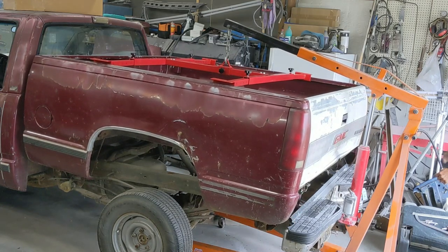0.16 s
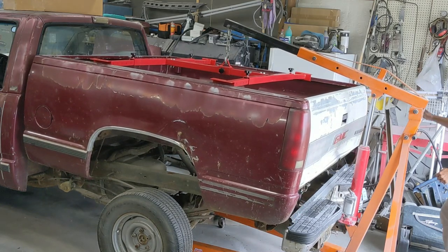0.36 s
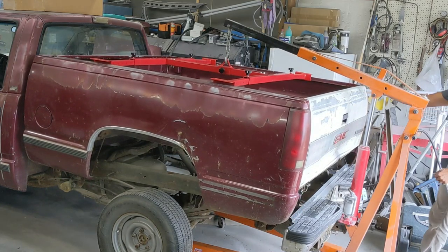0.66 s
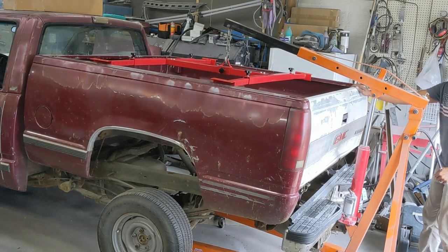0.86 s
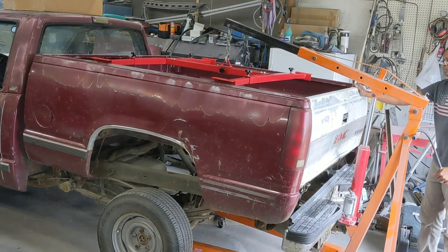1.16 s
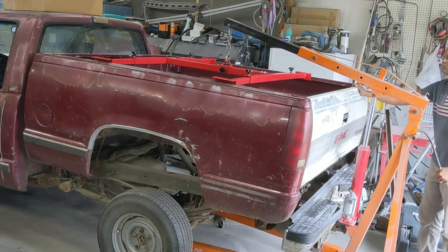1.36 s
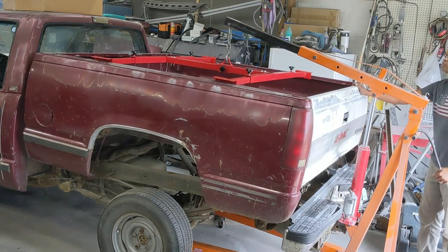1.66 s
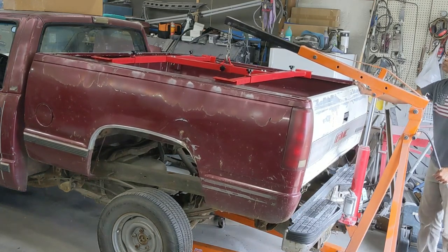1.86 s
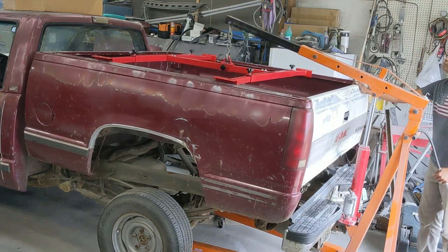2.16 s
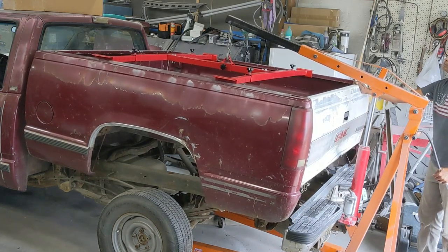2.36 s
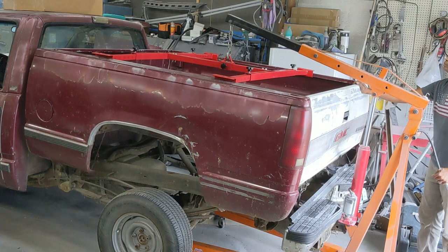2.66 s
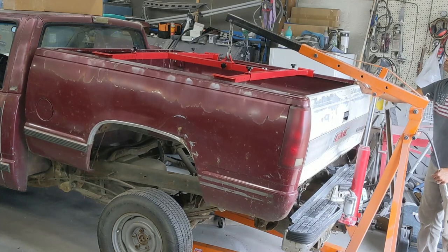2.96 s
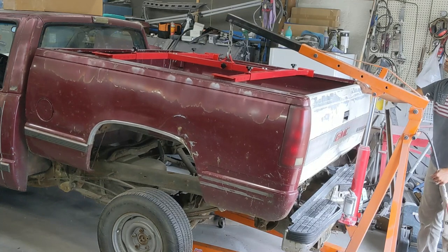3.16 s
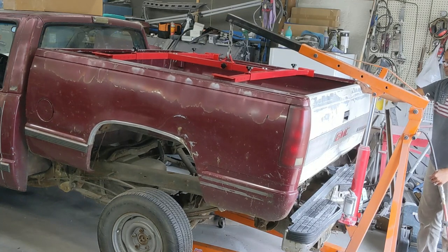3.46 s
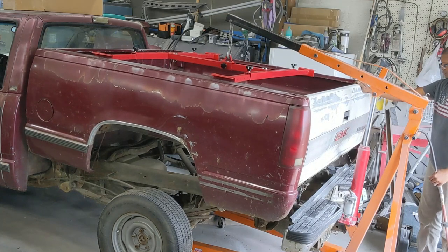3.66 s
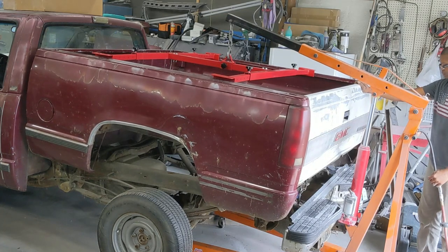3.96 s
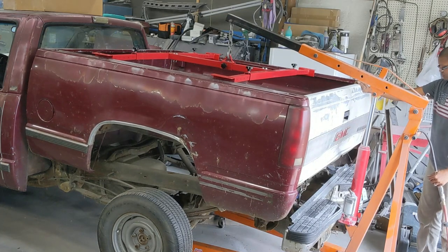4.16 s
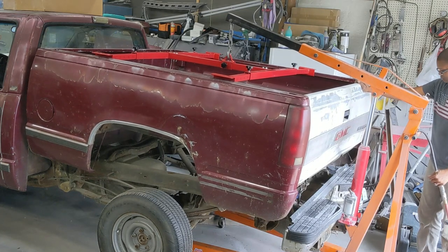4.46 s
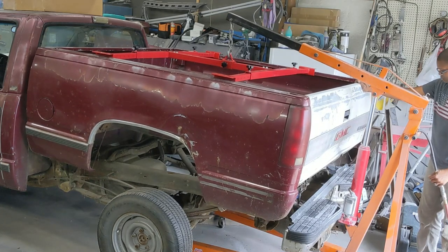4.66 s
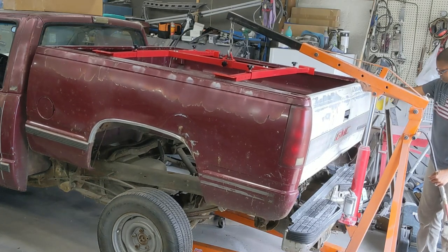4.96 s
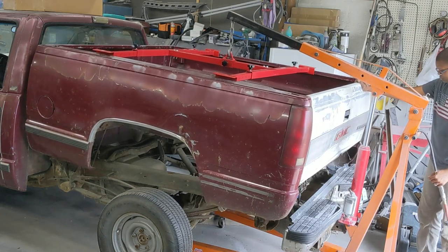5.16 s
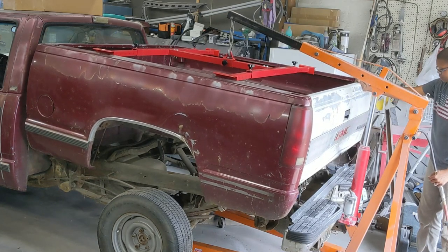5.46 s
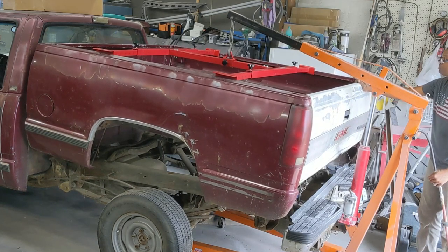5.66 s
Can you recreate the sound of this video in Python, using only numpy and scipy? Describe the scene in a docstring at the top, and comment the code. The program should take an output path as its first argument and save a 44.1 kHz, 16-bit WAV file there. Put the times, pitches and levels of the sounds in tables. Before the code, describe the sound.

Close stereo pickup of a pneumatic pump lifting a truck bed: isolated chuffs with clanking knocks, then a machine-like burst of about a dozen strokes. A pause of around a second and a half holds only low hum, rumble, a faint tick and a dull clunk. Pumping then resumes briefly and slows to single strokes, with feed air hissing underneath and short garage reverberation.

```python
"""An air-driven hydraulic ram on an engine hoist lifts a pickup bed in a garage: single strokes and two quick runs.
Each stroke vents a puff of jet noise with a low thump from the shoved hoist.
Some 30 ms later the pump piston lands: a dull knock, with near echoes, and ringing modes of the steel frame.
Feed air hisses as filtered noise while the trigger is held; hoist, trigger and load give a few small noise bursts.
A wavering hum of four tones and a low noise rumble fill the room."""
import sys
import numpy as np
from scipy import signal
from scipy.fft import rfft, irfft
from scipy.io import wavfile

SR = 44100
rng = np.random.default_rng(int(sys.argv[2]) if len(sys.argv) > 2 else 0)


def file_out(sig):
    """Save sig as 16-bit WAV at sys.argv[1]."""
    # one column per channel
    cols = np.atleast_2d(sig).T
    # limit, then scale
    lim = np.clip(cols, -1, 1)
    pcm = np.round(lim * 32767).astype(np.int16)
    wavfile.write(sys.argv[1], SR, pcm)


N = 255780  # length in samples


def amp(db):
    """Turn dB into a plain factor."""
    return 10 ** (np.asarray(db) / 20)


def unit(x):
    """Scale a sound to an rms of 1."""
    return x / np.sqrt(np.mean(x ** 2) + 1e-20)


def read(points, hz):
    """Read a curve between its points, along a logarithmic pitch scale."""
    point_hz, value = np.transpose(points)
    return np.interp(np.log(hz + 1), np.log(point_hz + 1), value)


def add(mix, s, sound):
    """Mix a sound in at a time in seconds."""
    part = mix[max(round(s * SR), 0):][:len(sound)]
    part += sound[:len(part)]


def late(x, s):
    """Delay a sound by some seconds."""
    return np.interp(np.arange(N) - s * SR, np.arange(N), x, left=0)


def convolve(x, response):
    """Start a copy of the response at every sample of x."""
    return signal.fftconvolve(np.atleast_2d(x), np.atleast_2d(response), axes=1)[:, :N]


def click(points, size=4096):
    """Causal impulse of energy 1 with the given spectrum."""
    hz = abs(np.fft.fftfreq(size, 1 / SR))
    log_gain = np.log(amp(read(points, hz)))
    # this choice of phase puts the energy as early as possible
    spectrum = np.exp(np.conj(signal.hilbert(log_gain)))
    h = np.fft.ifft(spectrum).real
    return h / np.linalg.norm(h)


def ring(modes):
    """One second of dying modes, each a sine that falls 60 dB in its t60."""
    t = np.arange(SR) / SR
    return sum(amp(db - 60 * t / t60) * np.sin(2 * np.pi * hz * t) for hz, db, t60 in modes)


def strike(modes, times, levels_db, scatter, vary_db):
    """Blows on one set of modes; each time every mode starts a little late and rings louder or softer."""
    out = np.zeros(N)
    tones = [ring([mode]) for mode in modes]
    for s, db in zip(times, levels_db):
        for tone, (delay, vary) in zip(tones, rng.standard_normal((len(tones), 2))):
            add(out, s + scatter * abs(delay), amp(db + vary_db * vary) * tone)
    return out


def drift(rate):
    """Slow random wander of rms 1; its spectrum fades out around the rate in Hz."""
    fade = np.exp(-(np.fft.rfftfreq(N, 1 / SR) / rate) ** 2)
    return unit(irfft(rfft(rng.standard_normal(N)) * fade, N))


# How alike diffuse sound is at left and right.
# Each row: frequency in Hz, likeness from 0 (unrelated) to 1 (the same).
LIKENESS = [(100, 0.85), (400, 0.71), (900, 0.38), (1800, 0.12), (4000, 0.13), (16000, .1)]


def diffuse(size):
    """Spectra of noise at two close microphones: alike in the bass, nearly unrelated in the treble."""
    hz = np.fft.rfftfreq(size, 1 / SR)
    a, b = np.exp(2j * np.pi * rng.random((2, len(hz))))
    alike = np.clip(read(LIKENESS, hz), 0, 1)
    mid = np.sqrt((1 + alike) / 2) * a
    side = np.sqrt((1 - alike) / 2) * b
    return hz, np.array([mid + side, mid - side])


# Tones of the machine hum. Each row: frequency in Hz, level in dB before the swell.
HUM = [(53.8, -47.5), (102.3, -44), (134.6, -45.5), (204.6, -52.5)]
# Slow rise and fall of the whole hum. Each row: time in seconds, change in dB.
HUM_SWELL = [(0, -13), (.7, -3), (3.3, 0), (3.9, -4), (4.25, 1.5), (5.8, -2.5)]
# Colour of the room's rumble. Each row: frequency in Hz, relative level in dB per Hz.
RUMBLE = [(20, -29), (45, -22), (75, -0.5), (90, 6), (115, -13.5), (145, 1), (180, -12.5), (310, -26),
          (600, -34), (1500, -33.5), (4000, -43.5), (10000, -48), (14000, -44)]


def background(rumble_db=-42, waver=0.19, thin_db=-73, thin_hz=7550, thin_width_hz=200):
    """A wavering machine hum over low rumble, with a faint thin hiss high up."""
    t = np.arange(N) / SR
    hum = np.zeros(N)
    for hz, db in HUM:
        loudness = amp(db) * np.sqrt(2) * (1 + waver * drift(8.1))
        phase = 2 * np.pi * (hz * t + rng.random()) + .5 * drift(5.4)
        hum += loudness * np.cos(phase)
    swell = amp(np.interp(t, *np.transpose(HUM_SWELL)))
    hz, noise = diffuse(N)
    rumble = unit(irfft(noise * amp(read(RUMBLE, hz)), N))
    narrow = 1 / (1 + ((hz - thin_hz) / thin_width_hz) ** 2)
    thin_hiss = unit(irfft(diffuse(N)[1] * narrow, N))
    return hum * swell + amp(rumble_db) * rumble + amp(thin_db) * thin_hiss


# Resonances of the air motor housing, blown by the air and tapped by the valve.
# Each row: frequency in Hz, width in Hz, relative level in dB.
HOUSING = [(1062.6, 16, 12.5), (1145, 13, 11), (1370, 24, 2), (1502, 30, 3), (1734, 120, -5),
           (1717, 28, 16.5), (1888, 16, 9.5), (2393, 50, 6.5)]


def blow_housing(air):
    """Rushing air sounds the resonances of the motor housing."""
    return sum(amp(db) * signal.lfilter(*signal.iirpeak(hz, hz / width, SR), air)
               for hz, width, db in HOUSING)


# Colour of the feed air in the trigger valve. Each row: frequency in Hz, relative level in dB per Hz.
FEED_AIR = [(200, 14), (900, -7), (2200, -2), (3300, -1), (6500, 2.5), (8000, -3), (10500, -3),
            (12500, 5.5), (14000, 4.5), (15800, 1)]
# Squeezes of the air trigger. Each row: pressed in seconds, fully shut in seconds,
# relative hiss level in dB when fully down, time to press in seconds,
# time to ease off before it is shut in seconds.
TRIGGER = [(0, 0.056, -24.5, .004, 0.057), (.255, .42, -51.5, .02, 0.11), (0.841, 2.92, -32.5, .62, 0.13),
           (2.918, 3.32, -61, .02, .13), (4.353, 5.5, -33, .04, 0.37)]


def feed(flutter_db=1.3, flutter_hz=30, housing_db=-12):
    """Air hisses through the trigger valve and the housing, louder the further the trigger is pressed."""
    t = np.arange(N) / SR
    flow = np.zeros(N)
    for pressed, shut, db, press_s, ease_s in TRIGGER:
        squeeze = np.minimum((t - pressed) / press_s, (shut - t) / ease_s)
        flow += amp(db) * np.clip(squeeze, 0, 1)
    air = rng.standard_normal(N) * flow * amp(flutter_db * drift(flutter_hz))
    return convolve(air, click(FEED_AIR))[0] + amp(housing_db) * blow_housing(air)


# Runs of the pump; when the two times nearly agree, the run is one stroke at the first time.
# Each row: first stroke in seconds, last stroke in seconds, then three changes in dB:
# piston, exhaust air and valve rattle.
RUNS = [(0.0283, 0.033, 0, .3, 1), (.335, 0.33, .8, -.8, 5), (1.0178, 1.001, 1, .3, 4),
        (1.25, 1.26, .3, -1.5, -3), (1.4105, 1.386, -.5, .6, -3), (1.5405, 2.8408, -.6, -.3, -1),
        (4.4379, 5.0140, 0.52, .1, 1), (5.138, 5.1382, .5, 0, -1), (5.294, 5.318, .5, 0, 0),
        (5.4701, 5.487, -.3, -2.5, 1)]
PERIOD_S = .117  # about one stroke at full speed; sets how many strokes fill a run
SAG_S = 0.002096  # the pump slows as pressure builds, so the middle of a run comes this much early
TRAVEL_S, TRAVEL_SCATTER_S = .0328, .0009  # from the exhaust opening to the piston landing


def strokes():
    """Fill each run with strokes at the pump's pace: exhaust and landing times, and three levels."""
    rows = []
    for first, last, *levels_db in RUNS:
        along = np.linspace(0, 1, round(abs(last - first) / PERIOD_S) + 1)
        times = first + (last - first) * along - SAG_S * np.sin(np.pi * along)
        rows += [(s, *levels_db) for s in times]
    opens, piston_db, air_db, rattle_db = np.transpose(rows)
    lands = opens + TRAVEL_S + TRAVEL_SCATTER_S * rng.standard_normal(len(opens))
    return opens, lands, piston_db, air_db, rattle_db


def uneven(levels_db, spread_db):
    """No two strokes are quite equally strong."""
    return levels_db + spread_db * rng.standard_normal(len(levels_db))


def blows(times, levels_db):
    """One impulse a stroke."""
    out = np.zeros(N)
    for s, db in zip(times, levels_db):
        add(out, s, amp([db]))
    return out


# Colour of the exhaust jet. Each row: frequency in Hz, relative level in dB per Hz.
JET = [(100, -2), (300, -8.5), (600, 0.5), (870, -17), (1100, 1.5), (2000, -0.5), (3300, -1), (5600, 1.5),
       (7600, -1.5), (9500, -1), (12000, 3), (15800, 0.5)]


def exhaust(opens, air_db, rattle_db, jet_db=-11.5, housing_db=-7, tap_db=-36,
            puff_spread_db=0.75, tap_spread_db=2.5, decay_s=0.017, swell_s=0.0042,
            crack_db=4, crack_s=0.0056, tap_delay_s=0.0057, bounce=0.042, sputter_db=2.8):
    """The port cracks open, then the chamber empties in sputtering jet noise that also sounds the housing."""
    puff_db = uneven(air_db, puff_spread_db)
    valve_db = uneven(rattle_db, tap_spread_db)
    t = np.arange(SR // 5) / SR
    emptying = (1 - np.exp(-(t / swell_s) ** 2)) * np.exp(-t / decay_s)
    crack = (t / crack_s) ** 2 * np.exp(1 - (t / crack_s) ** 2)  # full pressure escapes first
    flow = emptying / emptying.max() + amp(crack_db) * crack
    puffs = convolve(blows(opens, puff_db), flow)[0]
    burst = puffs * rng.standard_normal(N) * amp(sputter_db * drift(250))
    jet = convolve(burst, click(JET))[0]
    # the ram's own barrel reflects the jet and ripples its treble
    jet = jet + bounce * late(jet, 0.00099)
    blown = blow_housing(burst)
    # the valve rattles as it shifts; a resonance's width sets how fast it dies
    modes = [(hz, db, np.log(1000) / np.pi / width) for hz, width, db in HOUSING]
    tapped = strike(modes, opens + tap_delay_s, valve_db, scatter=0.00201, vary_db=3.5)
    return amp(jet_db) * jet, amp(jet_db + housing_db) * blown + amp(tap_db) * tapped


def shove(times, levels_db, delay, hz, width):
    """One short to-and-fro swing of air pressure a stroke."""
    t = np.arange(-SR // 20, SR // 20) / SR
    out = np.zeros(N)
    for s, db in zip(times, levels_db):
        u = t[t + s + delay >= 0]  # leave out what falls before the start
        swing = -amp(db) * np.cos(2 * np.pi * hz * u) * np.exp(-(u / width) ** 2)
        add(out, s + delay + u[0], swing)
    return out


# Low modes of the hoist and its load, pushed by each stroke.
# Each row: frequency in Hz, relative level in dB, time to fall 60 dB in seconds.
BODY = [(68, -32.5, .25), (82, -25, 0.69), (84.03, -2, 0.74), (104.8, -3.5, .25), (135.7, -2, 0.59),
        (147.46, 0, 0.67)]
# The piston sets off: seconds after the exhaust opens, frequency in Hz, half length in seconds.
PUSH = (.0238, 82, .013)
# The piston is stopped: seconds after it lands, frequency in Hz, half length in seconds.
RECOIL = (.0015, 135, .009)


def thump(opens, lands, strength_db, push_db=-15.5, recoil_db=-20.5, body_db=-27,
          spread_db=0.6, lead_s=0.0063, top_hz=240):
    """The piston shoves the hoist as it starts and again as it stops; the low modes swing on."""
    thump_db = uneven(strength_db, spread_db)
    push = amp(push_db) * shove(opens, thump_db, *PUSH)
    recoil = amp(recoil_db) * shove(lands, thump_db, *RECOIL)
    body = amp(body_db) * strike(BODY, lands - lead_s, thump_db, scatter=0.00065, vary_db=3.5)
    swing = push - recoil + body
    high_cut = 1 / (1 + (np.fft.rfftfreq(N, 1 / SR) / top_hz) ** 4)
    return irfft(rfft(swing) * high_cut, N)


# Colour of the dead first part of the knock. Each row: frequency in Hz, relative level in dB per Hz.
KNOCK = [(60, 4), (200, -12.5), (380, -10), (470, -4.5), (560, 0), (690, -6), (870, -25.5), (1150, -10.5),
         (1800, -19.5), (3000, -16.5), (15000, -35.5)]
# Near surfaces that throw the knock back. Each row: delay in seconds, level in dB against the blow.
ECHOES = [(.0087, -9.5), (0.0104, -6), (.0183, -8), (0.026, -11.5)]
# Steel frame, struck by the piston and jarred by the settling load.
# Each row: frequency in Hz, relative level in dB, time to fall 60 dB in seconds.
FRAME = [(238.5, -3, 0.7), (270.4, 0.5, 0.51), (323, -0.5, 0.57), (361.7, -3, .45), (428, -12.5, .35),
         (508, -6.5, 0.53), (479, -9.5, 0.94), (549, 3, 0.29), (580, -1, 0.58), (643, -8, 1.05),
         (680, -4, 0.42), (730, 0, .55), (893, -18, .9), (1073, -12, 0.45), (1220, -7, 0.59),
         (2590, -5, .45)]


def knock(lands, strength_db, blow_db=8, frame_db=-36, spread_db=0.85):
    """The piston lands: a dull blow with near echoes, and the ringing of the frame."""
    knock_db = uneven(strength_db, spread_db)
    blow = amp(blow_db) * convolve(blows(lands, knock_db), click(KNOCK))[0]
    echoes = sum(amp(db) * late(blow, s) for s, db in ECHOES)
    frame = amp(frame_db) * strike(FRAME, lands, knock_db, scatter=0.00057, vary_db=3)
    return blow + echoes, frame


# Small noises of the hoist, its trigger and its load. Each row: start in seconds,
# relative level in dB, centre frequency in Hz, spread in octaves, decay in seconds.
SHIFTS = [(0.61, -49, 2430, 1.5, 0.041), (.659, -50, 2520, 0.9, .025), (3.275, -40.5, 11900, 1.3, 0.0086),
          (3.744, -39, 960, 0.92, 0.024), (3.754, -36, 296, .4, 0.043), (3.903, -48.5, 268, 0.23, 0.0295)]
SETTLE_S, SETTLE_DB = 3.748, -57  # the load settles and jars the frame (relative level)


def shifts():
    """Noise bursts: short scrapes, a tick, probably of the trigger, and a clunk as the load settles."""
    out = np.zeros(N)
    t = np.arange(SR // 2) / SR
    hz = np.fft.rfftfreq(len(t), 1 / SR)
    for s, db, centre_hz, spread, decay in SHIFTS:
        colour = np.exp(-.5 * (np.log2((hz + 1) / centre_hz) / spread) ** 2)
        noise = unit(irfft(rfft(rng.standard_normal(len(t))) * colour, len(t)))
        add(out, s, amp(db) * np.exp(-t / decay) * noise)
    return out + strike(FRAME, [SETTLE_S], [SETTLE_DB], scatter=0.0043, vary_db=2.5)


def direct(x):
    """The ram stands to the right, so its direct sound reaches the left microphone 5 samples later."""
    return np.array([late(x, 5 / SR), x])


# How long the garage echoes. Each row: frequency in Hz, time to fall 60 dB in seconds.
GARAGE = [(100, 0.55), (500, 0.47), (1200, 0.44), (2700, 0.39), (5500, 0.33), (10000, 0.33), (16000, 0.22)]


def reverberate(x, fixed_share=0.49, early_db=6, early_decay_s=0.0099, build_s=0.005, size=256):
    """Scatter from nearby clutter, then a tail that dies sooner in the treble; part set paths, part wash."""
    def spectra(length):
        return signal.stft(unit(irfft(diffuse(length)[1], length)), SR, nperseg=size)

    hz, t, paths = spectra(SR)
    tail = amp(-60 * t / read(GARAGE, hz)[:, None])
    clutter = 1 + amp(early_db) * np.exp(-t / early_decay_s)
    decay = tail * (1 - np.exp(-t / build_s)) * clutter
    response = signal.istft(paths * decay, SR, nperseg=size)[1][:, :SR]
    echoed = convolve(x, response / np.linalg.norm(response[0]))
    # energy left in the room, band by band, shapes the wash
    power = abs(signal.stft(x, SR, nperseg=size)[2]) ** 2
    stored = abs(signal.fftconvolve(power, decay ** 2, axes=1))[:, :power.shape[1]]
    wash = signal.istft(spectra(N)[2] * np.sqrt(stored), SR, nperseg=size)[1][:, :N]
    wash = unit(wash) * echoed.std()
    return np.sqrt(fixed_share) * echoed + np.sqrt(1 - fixed_share) * wash


def scene():
    """Near sound and its echo in the garage, over the bass and the hum."""
    opens, lands, piston_db, air_db, rattle_db = strokes()
    jet, housing = exhaust(opens, air_db, rattle_db)
    blow, frame = knock(lands, piston_db)
    small = feed() + shifts()
    near = amp(-8.5) * jet + amp(-5.5) * housing + blow + amp(-0.5) * frame + amp(-2) * small
    far = amp(-2.5) * jet + amp(-9.5) * housing + amp(-4) * blow + amp(-12.5) * frame + small
    return direct(near) + reverberate(far) + thump(opens, lands, piston_db) + background()


# Balance of the two microphones. Each row: frequency in Hz, right over left in dB.
TILT = [(60, 1), (500, 1.5), (1500, 1.2), (3000, 0), (5300, -.3), (6400, 2.5), (8500, 2.5), (12000, 4.5),
        (14000, 3.5), (15800, .5)]


def record(dry, low_hz=46, ceiling=.95, edge_hz=15950):
    """The right microphone is mostly the brighter one; a low cut, rounded peaks, then the band limit."""
    hz = np.fft.rfftfreq(N, 1 / SR)
    tilt_db = read(TILT, hz)
    balance = amp(np.array([-tilt_db, tilt_db]) / 2)
    low_cut = 1 - 1 / (1 + (hz / low_hz) ** 8)
    heard = irfft(rfft(dry) * low_cut * balance, N)
    rounded = heard / (1 + (heard / ceiling) ** 8) ** (1 / 8)
    band_limit = signal.firwin(601, edge_hz, window=("kaiser", 8), fs=SR)
    return signal.oaconvolve(rounded, band_limit[None], "same")


dry = scene()
out = record(dry)
file_out(out)
```